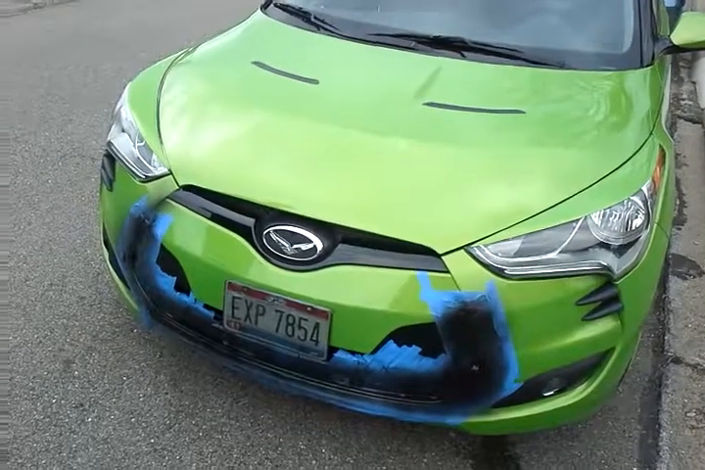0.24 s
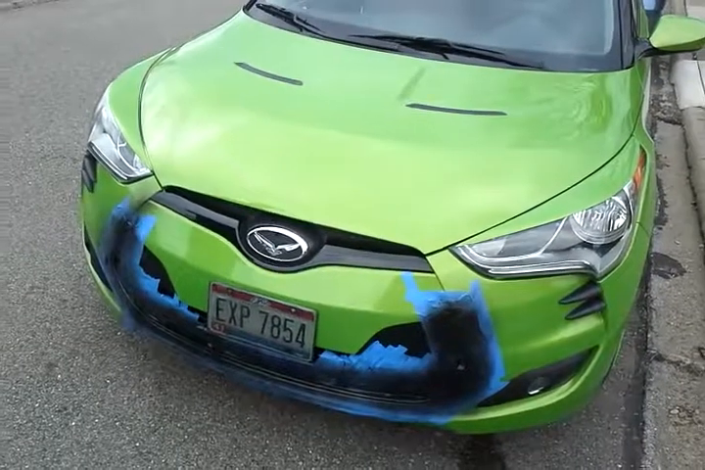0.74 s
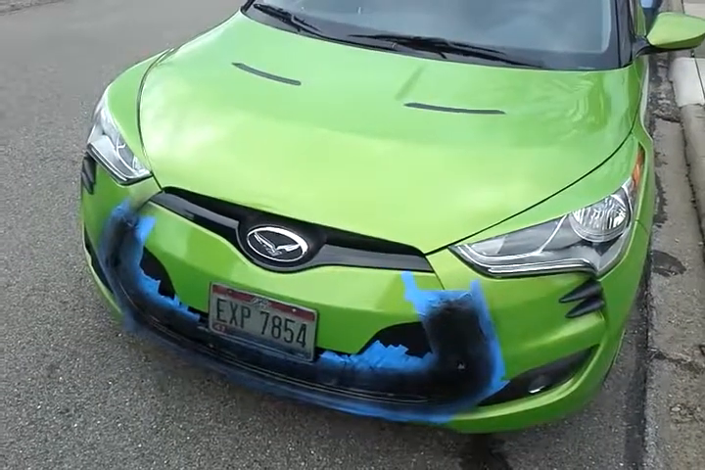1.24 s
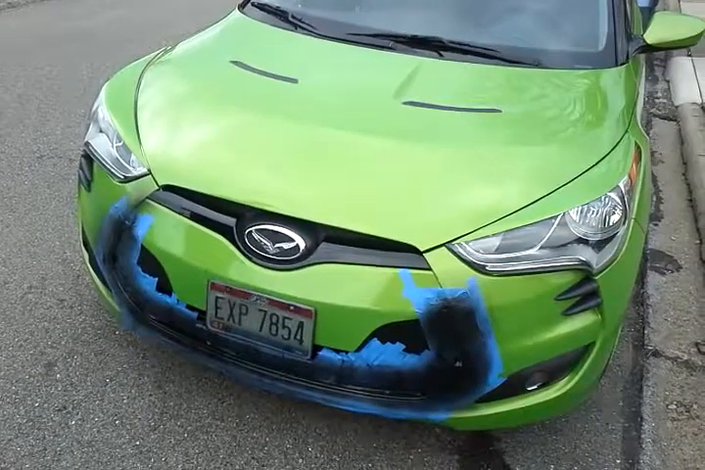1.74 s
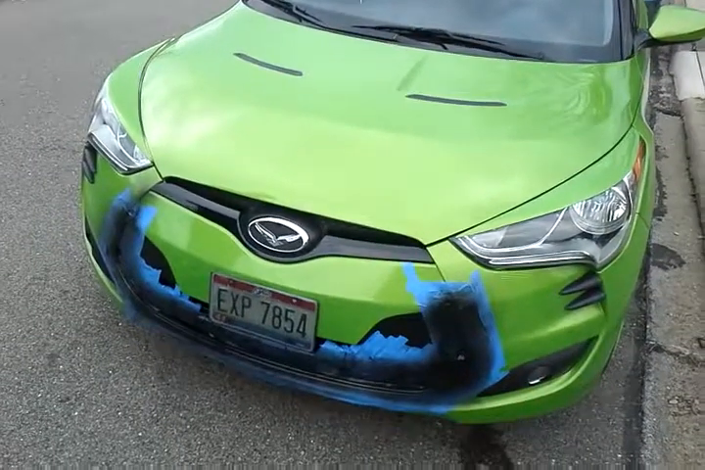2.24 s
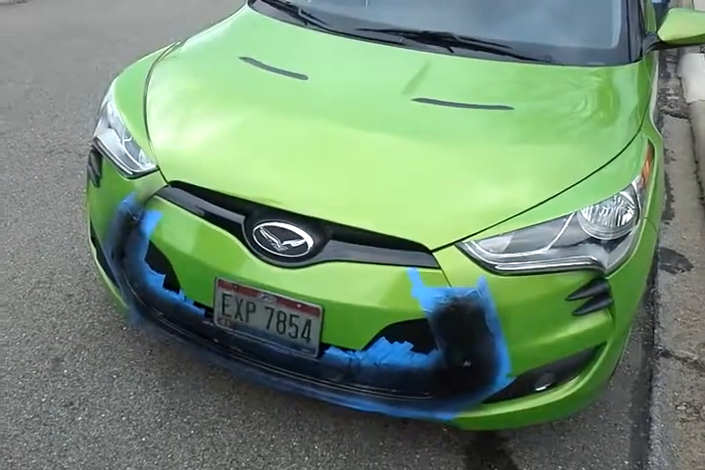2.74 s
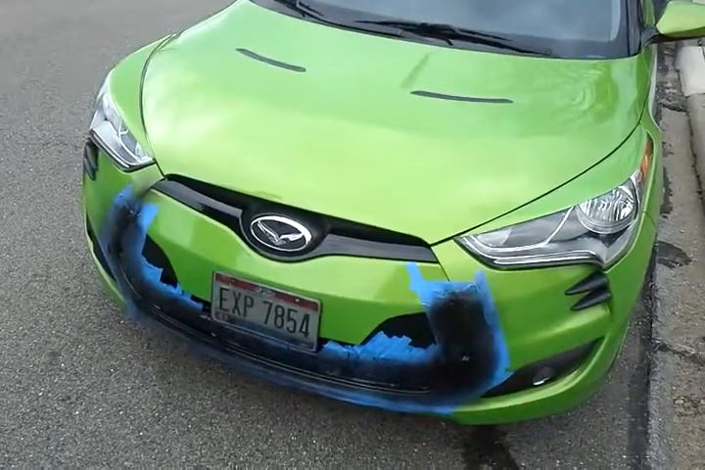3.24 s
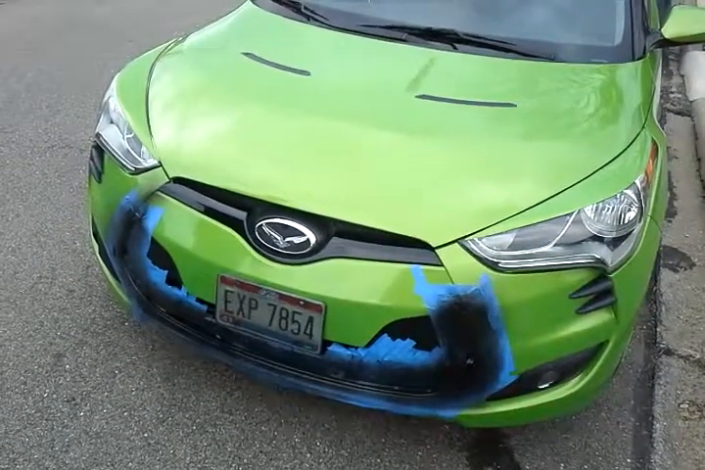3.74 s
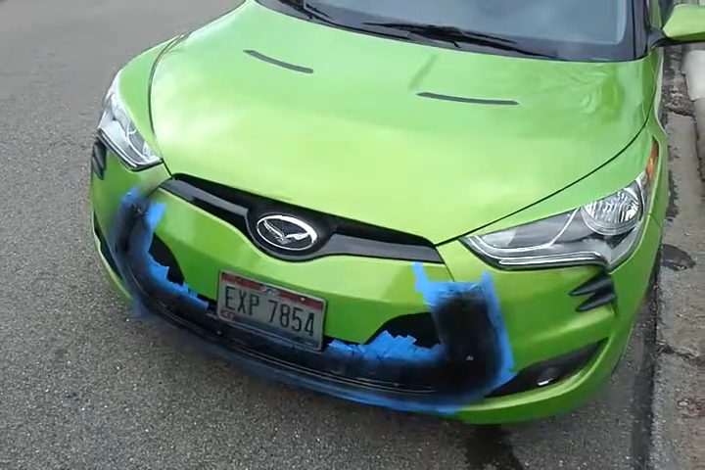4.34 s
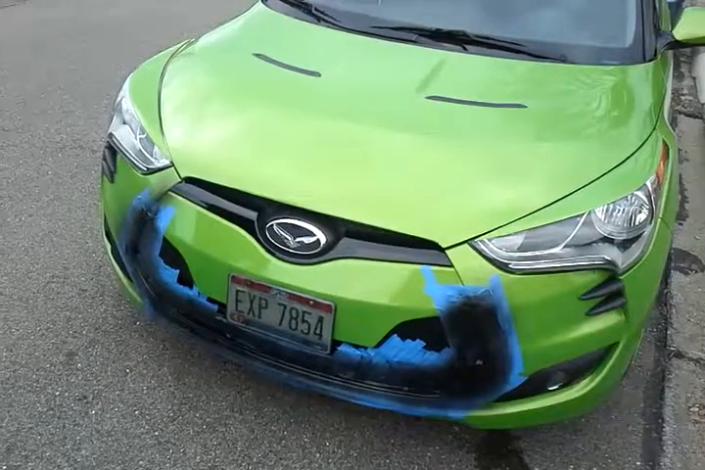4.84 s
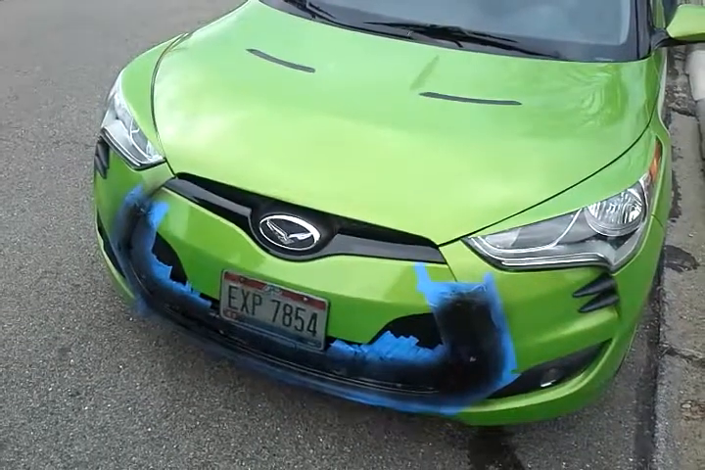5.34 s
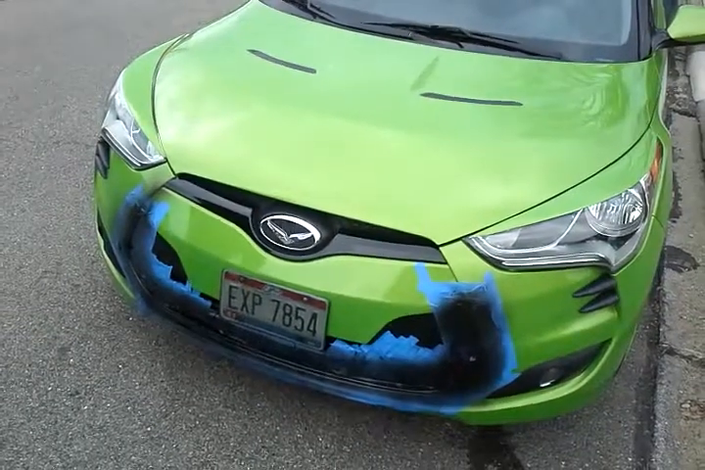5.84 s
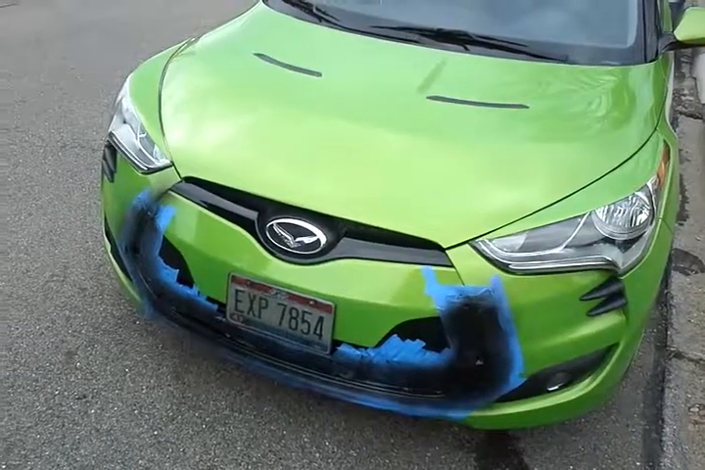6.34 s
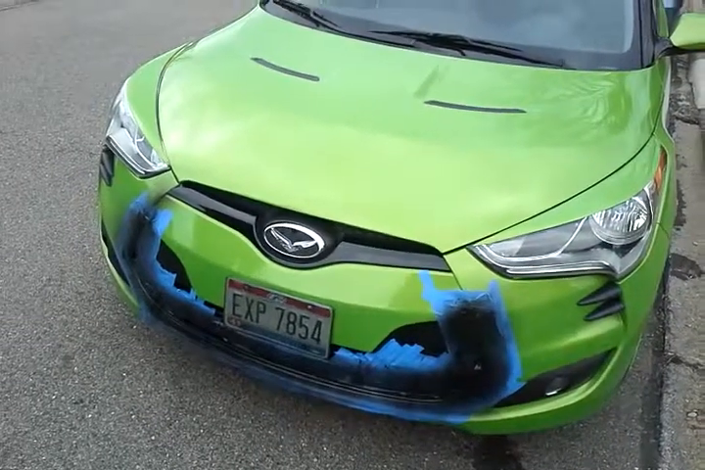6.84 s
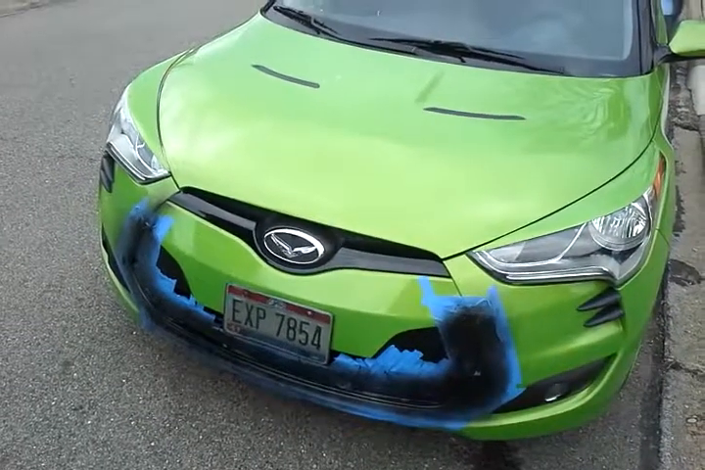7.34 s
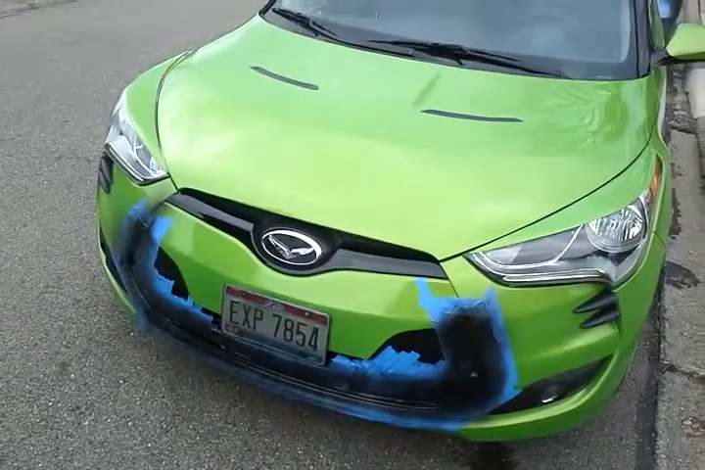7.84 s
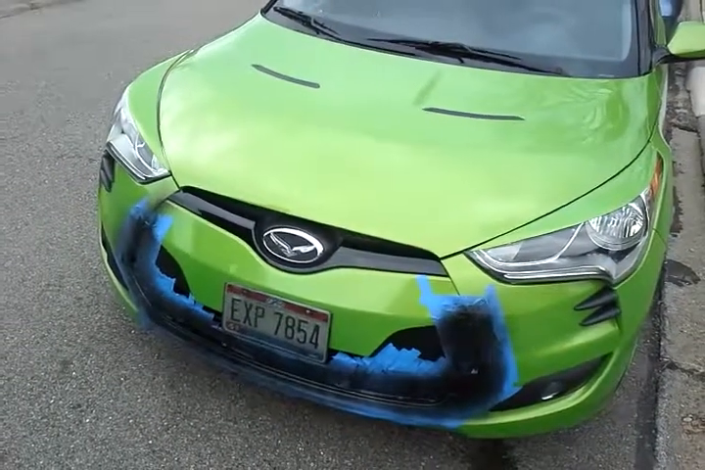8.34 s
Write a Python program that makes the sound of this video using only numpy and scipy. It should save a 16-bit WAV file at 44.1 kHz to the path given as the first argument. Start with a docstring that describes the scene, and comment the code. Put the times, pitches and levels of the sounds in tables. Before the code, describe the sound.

Outdoors, wind puffs and bird whistles and a fast trill over faint traffic, then a spray can is shaken, its ball clacking loudly.

```python
"""Gusts puff into two microphone ports while far traffic hums, and birds whistle, trill and chirp as gliding sines.
Then a spray can is handled with three faint ticks and shaken beside the street: its mixing ball clacks on damped
tin, ringing crowds of decaying modes, and rolling and splashing ring the same tin with dense ticks. Each clack
returns from the asphalt a few ms later and scatters nearby and along the street. The loudest clacks overload the
recorder. Gusts are band-passed random knocks; traffic is noise in third-octave bands."""
import sys
import numpy as np
from scipy import signal
from scipy.io import wavfile

SR = 44100
rng = np.random.default_rng(int(sys.argv[2]) if len(sys.argv) > 2 else 0)


def waveform_to_disk(signal):
    """Save audio, clipped to [-1, 1], as 16-bit WAV at the path in sys.argv[1]."""
    frames = np.transpose(np.atleast_2d(signal))
    scaled = np.clip(frames, -1, 1) * 32767
    samples = np.round(scaled).astype(np.int16)
    wavfile.write(sys.argv[1], SR, samples)


N = 378819

# Gusts on the ports: start_s, length_s, level_db (low part, stronger port), left_minus_right_db
GUSTS = [(0, .041, -31, 10), (0.052, 0.18, -29.5, 14), (0.228, .28, -28.5, 22), (0.244, 0.039, -31.5, -18),
         (0.296, 0.11, -38, -2), (.456, 0.047, -31, -31), (0.48, 0.075, -24, 22), (.519, 0.05, -28.5, 10),
         (0.57, .108, -42.5, 14), (0.799, 0.041, -40.5, 10), (0.893, 0.082, -37.5, -17),
         (2.394, 0.064, -44, 7), (2.493, .114, -51, -3), (3.55, 0.082, -46, 22), (3.673, 0.039, -30.5, 24),
         (3.722, 0.14, -42, 27), (3.781, 0.066, -36, -32), (3.902, 0.14, -40.5, 21), (4.2, 0.13, -43, -17),
         (4.47, .087, -41, 1), (5.238, .056, -39, 18), (5.329, 0.075, -31, 28), (5.377, 0.11, -23.5, 32),
         (5.926, 0.075, -39, -2), (7.434, 0.064, -43, -15)]

# Spectrum of far traffic and air: frequency_hz, relative_level_db (per Hz)
STREET_SPECTRUM = [(24, -42), (40, -10), (76, -2.5), (219, -1.5), (281, -6.5), (416, -0.5), (588, -9.5),
                   (830, 3.5), (1430, -10.5), (2520, -11.5), (2780, -16), (3220, -16), (5970, -28.5),
                   (8020, -20.5), (14500, -27.5)]
# Likeness of the street sound at the two ports: frequency_hz, correlation (-1 to 1)
STREET_LIKENESS = [(60, 0.31), (180, 0.78), (550, 0.83), (1650, -0.2), (4970, -0.000023), (15000, -0.081)]
STREET_DB = -47.5   # rms

# Long whistles of the near bird: start_s, length_s, pitch_hz (at the start), level_db
LONG_NOTES = [(0.024, 0.15, 3427, -35), (0.413, 0.225, 3383, -34.5)]
# Overtones of the long whistles: multiple, level_db (against the fundamental)
OVERTONES = [(3, -32)]
RISE_S, RISE_DB = .03, -22       # swell at the start: duration, starting level
SAG_HZ, SAG_DB = -14.5, -8       # change of pitch and level by the end
FALTER_AT, FALTER_WIDTH, FALTER_DB = 0.66, .1, -13   # one dip: two shares of the length, depth
TRAIL_S, TRAIL_DB, TRAIL_END_DB = 0.29, -19, -37.5   # faint lingering: end after the note, first and last level

# One trill note: time_s (from its reference instant), pitch_hz, relative_level_db
TRILL_NOTE = [(-.012, 3450, -36), (-.008, 3700, -16), (-.001, 4200, -9.5), (0, 4850, -22),
              (.003, 3190, -2.5), (.008, 2950, -12.5), (.016, 2830, -23), (.02, 2730, -25)]
TRILL_COUNT, TRILL_START_S = 14, .9383
TRILL_GAP_S, TRILL_SLOWS_S = .0305, .00037   # first gap, widening per gap
TRILL_DB, TRILL_SWELL_DB, TRILL_ENDS_DB = -36, .15, -3   # base, rise per note, first and last note softer

# Hooked calls of a farther bird: top_s, level_db
HOOKS = [(1.714, -51), (1.875, -56), (5.845, -41.5), (5.999, -49), (6.245, -38.5), (8.054, -51)]
# Shape of the hooked call: time_s (from its top), pitch_hz, relative_level_db
HOOK = [(-.055, 2700, -14), (-.025, 3230, -3), (0, 3360, 0), (.014, 2500, -7), (.09, 2280, -12)]
# Other far chirps: start_s, length_s, first_hz, last_hz, arch_hz, level_db
GLIDES = [(0, 0.077, 7170, 6930, 2, -55), (.008, 0.014, 5000, 4400, -100, -43),
          (0.321, 0.053, 3220, 3110, 2, -52), (0.349, 0.1, 7180, 6880, 50, -49.5),
          (0.393, .02, 5350, 4410, -250, -44), (0.483, 0.083, 2630, 2600, 218, -58),
          (0.562, .04, 2340, 2180, 100, -56), (0.614, 0.08, 2490, 2420, 222, -51),
          (0.719, 0.012, 6000, 9260, 0, -38), (0.733, 0.015, 4960, 4550, 0, -44),
          (.87, 0.073, 2190, 2117, 91, -45.5), (1.13, .04, 2300, 2300, 72, -58),
          (1.282, 0.064, 3000, 3000, 385, -44.5), (2.05, 0.084, 2285, 2420, -2, -60),
          (2.197, 0.31, 2490, 2320, -56, -58.5), (2.275, .28, 2870, 2610, 43.5, -61.5),
          (2.2, 0.16, 7350, 6900, 348, -61), (2.448, 0.12, 6730, 6800, 600, -62),
          (2.57, 0.064, 1740, 1970, 3, -50), (2.67, 0.026, 4000, 5600, 0, -54),
          (2.694, .11, 2830, 3070, 1280, -51.5), (2.746, 0.17, 6940, 7130, 150, -65.5),
          (3.047, 0.19, 7000, 6950, 898, -62), (3.393, 0.19, 6700, 7060, 0, -63),
          (3.497, .09, 2890, 3130, 98, -58.5), (3.642, 0.071, 2900, 3170, 78, -57.5),
          (6.167, 0.028, 4360, 4150, 0, -47), (7.012, .04, 3050, 3080, 60, -50),
          (7.09, .03, 2600, 2720, 0, -44)]
# Level contour of a chirp at its start, each quarter and end: relative_level_db
GLIDE_DB = [-5, -0.5, 1.5, -2.5, -9.5]
NEAR_BIRD_PAN_DB, FAR_BIRD_PAN_DB, BIRD_LAG_S = -7.5, -4, 0.000309   # left minus right; left port late
NEAR_BIRD_ECHO, FAR_BIRD_ECHO = (0.53, -2.5), (.3, -7)   # t60_s, level_db
FAR_FLUTTER_DB = 3.0   # standard deviation

# Blows of the ball in the can, preceded by three faint ticks as the can is handled:
# time_s, strength_db, high_ring_db (added to the modes above 6 kHz)
CLACKS = [(3.188, -49, -12), (3.397, -45, -6), (3.432, -47, -9), (3.8225, -25, 1.5), (3.8942, -36, -5),
          (3.9074, -32.5, 5.5), (3.93, -34, 6), (3.9792, -33.5, -6.5), (4.0868, -18, -12), (4.107, -27, 1),
          (4.1186, -32, 1), (4.215, -35.5, -17), (4.3232, -23, -1.5), (4.35, -29, 0), (4.3737, -26.5, -2.5),
          (4.4704, -34, -3), (4.4868, -34, -1), (4.52, -32, -4), (4.5372, -11.5, -6), (4.618, -34, 3.5),
          (4.639, -33.5, 1.5), (4.6629, -37.5, -2), (4.725, -20, -1.5), (4.746, -33.5, 2), (4.7717, -37, 4),
          (4.8092, -12, -4), (4.8619, -39.5, -9), (4.9982, -23.5, 2.5), (5.0469, -33.5, 2),
          (5.095, -12, -6), (5.1112, -30, 3), (5.1676, -46, 4), (5.2693, -13.5, -1.5), (5.3161, -31.5, 2),
          (5.3397, -37, 6), (5.3794, -10, -6), (5.404, -28, 1.5), (5.4532, -30.5, 2), (5.5341, -12, 4),
          (5.5934, -22.5, 3), (5.6386, -9.5, -9), (5.677, -39.5, 9), (5.7214, -43, 4), (5.7525, -39, -4),
          (5.7975, -13, -2.5), (5.8493, -23.5, -2.5), (5.882, -15.5, -6), (5.8931, -19.5, -2.5),
          (5.9375, -23.5, -29), (6.0086, -23.5, -4), (6.0431, -16, -1.5), (6.0847, -24, 3),
          (6.1287, -21, -6), (6.1372, -12, -7), (6.208, -36, 5), (6.263, -9, 0.5), (6.3183, -25, 3.5),
          (6.3438, -25, 0.5), (6.3922, -14, -0.5), (6.4217, -26, 1.5), (6.4368, -28, 0), (6.4467, -31, 0),
          (6.5056, -7, -2.5), (6.5651, -24, 1.5), (6.596, -34, 5), (6.6252, -12, -7.5),
          (6.6422, -25.5, -0.5), (6.7111, -30.5, 5), (6.727, -11.5, -7.5), (6.8494, -10.5, -6),
          (6.8757, -38, -1), (6.9223, -38.5, -5), (6.9695, -10, -1.5), (7.0167, -36, -14),
          (7.044, -28.5, 5), (7.0728, -8, -7), (7.1278, -36, 5), (7.196, -11.5, -0.5), (7.2604, -23.5, 3.5),
          (7.3046, -9.5, -2.5), (7.3816, -41, -2), (7.437, -12.5, -7.5), (7.4753, -34.5, 5.5),
          (7.52, -24.5, 1), (7.5256, -13.5, -7.5), (7.5917, -22.5, -1.5), (7.6148, -27, -7.5),
          (7.633, -9.5, -6.5), (7.6758, -36, -10), (7.7018, -28, 3.5), (7.7493, -11, -13),
          (7.7691, -24, -5), (7.79, -36, -6), (7.815, -36, -2), (7.8653, -10.5, -3), (7.8993, -31, -15),
          (7.95, -35, 1), (7.9606, -17, -8), (7.969, -22.5, -10), (8.0418, -25, -1), (8.0859, -11.5, -8.5),
          (8.123, -33, -1), (8.15, -36, 1), (8.192, -24, -7), (8.2002, -14, -5.5), (8.264, -29, 4),
          (8.287, -41, -12), (8.3071, -10.5, -5), (8.4052, -32, 5.5), (8.4298, -15.5, -5.5),
          (8.444, -25.5, 0), (8.4623, -30, 0), (8.4736, -33, -17), (8.5456, -12.5, -8.5)]
# Tin held in the hand and damped by paint, each row a crowd of close modes: pitch_hz, level_db, t60_s
TIN = [(374, -25.5, 0.055), (508, -26.5, 0.023), (860, -22, 0.014), (1172, -8.5, 0.016),
       (1541, -9.5, 0.028), (2000, -2, 0.0082), (2452, -7, 0.015), (2790, -9.5, 0.0076), (3210, -15, 0.033),
       (3877, -6.5, 0.0043), (4610, -7.5, 0.0049), (5293, -8.5, 0.0046), (6360, -16, 0.0072),
       (6850, -8, 0.0038), (7830, -6, 0.0064), (8330, -5, 0.0066), (9145, -0.5, 0.0045), (9890, -4, 0.0067),
       (10910, -7, 0.0042), (11580, -3, 0.0021), (13380, -9, 0.0038), (15460, -21, 0.004)]
# Balance of the tin between the ports: frequency_hz, left_minus_right_db
TIN_BALANCE = [(700, -3.5), (1300, -0.5), (2400, -3.5), (4400, 3), (8000, -1), (14000, 9.5)]
CROWD, TIN_DB, SWELL_S = 4, 3.5, 0.00062   # modes per crowd, overall gain, onset time
# Low ring of a blow, relatively stronger for light blows: offset, db per dB of strength, standard deviation
LOW_RING_DB, LOW_RING_PER_DB, LOW_RING_SPREAD_DB = -11, -0.47, 3.0
STRONG_DB = -16   # blows above this bounce
BOUNCE_S, BOUNCE_SPREAD_S, BOUNCE_LEVEL_DB, BOUNCE_CHANCE_DB = 0.038, 0.0083, -43, 3.0   # means and spreads
GROUND_S, GROUND_DB = .0036, -5   # echo from the asphalt
PORT_LAG_S = .00027   # the can reaches the right port late
NEAR_T60_S, NEAR_DB = 0.021, -2.5   # hand, body and car scatter the clack
FAR_T60_S, FAR_DB = 0.1, -18.5      # then the street

# The ball rolls along the wall and the paint splashes: start_s, length_s, level_db
ROLLS = [(3.88, 0.16, -51), (4.0, .09, -52), (4.1, 0.067, -42.5), (4.18, 0.068, -46.5), (4.37, 0.054, -41),
         (4.45, 0.12, -35.5), (4.86, 0.047, -49.5), (5.16, 0.04, -57), (5.47, 0.043, -44),
         (5.71, 0.058, -45), (5.89, 0.031, -40), (5.97, 0.051, -50), (6.14, 0.031, -36.5),
         (6.19, 0.043, -39), (6.42, 0.084, -44), (7.12, .05, -41), (7.76, 0.078, -47), (7.94, 0.051, -37.5),
         (8.11, .05, -39), (8.2, 0.026, -39), (8.27, 0.049, -37), (8.35, 0.056, -44.5), (8.43, 0.082, -36)]
RATTLE = (3.8, 4.79, -52)   # faint long splash while shaking: start_s, length_s, level_db

CUTOFF_HZ = 15200   # start of the stop band


def from_db(db):
    """Decibels are twenty times the logarithm of an amplitude ratio."""
    return 10 ** (np.asarray(db) / 20)


def rms_one(x):
    """Division by the root mean square gives unit power."""
    return x / np.sqrt(np.mean(x ** 2) + 1e-20)


def at_hz(points, hz):
    """A spectrum is interpolated linearly over logarithmic frequency."""
    points = np.array(points)
    return np.interp(np.log(hz), np.log(points[:, 0]), points[:, 1])


def drift(rate_hz):
    """Noise through two equal real poles wanders slowly; its rms is one."""
    step = 40   # samples between computed values
    pole = np.exp(-2 * np.pi * rate_hz * step / SR)
    noise = rng.standard_normal(N // step + 2002)
    slow = signal.lfilter([1], [1, -2 * pole, pole * pole], noise)[2000:]
    return np.interp(np.arange(N) / step, np.arange(len(slow)), rms_one(slow))


def band(x, low_hz, high_hz):
    """A band-pass filter keeps the energy between two corner frequencies."""
    return signal.sosfilt(signal.butter(2, [low_hz, high_hz], "band", fs=SR, output="sos"), x)


def spans(rows, edge=0.5):
    """Envelopes superpose: one smooth hump per (start_s, length_s, level_db)."""
    out = np.zeros(N)
    for start, length, level_db in rows:
        i, j = max(0, int(start * SR)), min(N, int((start + length) * SR))
        out[i:j] += from_db(level_db) * signal.windows.tukey(j - i, edge)
    return out


def scattered(x, t60, level_db):
    """Diffuse reflection: dense echoes decay exponentially, independently at each port."""
    t = np.arange(int(t60 * SR)) / SR
    decay = from_db(-60 * t / t60)
    noise = rng.standard_normal((2, len(t)))
    echoes = rms_one(noise * decay) / np.sqrt(len(t))
    return from_db(level_db) * signal.fftconvolve(x, echoes, axes=1)[:, :N]


def gusts():
    """Turbulent pressure: eddies knock each port separately as low pulses, brighter when strong."""
    out = np.zeros((2, N))
    for port in range(2):
        knocks = rng.random(N) < 380.0 / SR   # 380 per second on average
        eddies = knocks * rng.standard_normal(N) * from_db(2.0 * drift(16))
        soft = rms_one(band(eddies, 93, 239))
        sharp = rms_one(band(band(eddies, 136, 385), 102, 660))
        sign = 2 * port - 1
        rows = [(start, length, level_db - max(0, pan_db * sign)) for start, length, level_db, pan_db in GUSTS]
        gain = spans(rows)
        out[port] = gain * (soft + 8.3 * gain * sharp)   # the sharp part grows with the square
    return out


def street():
    """Partial coherence: third-octave noise bands share a mid part and oppose a side part at the ports."""
    out, together = 0, drift(1.5)
    edges = 40 * 2 ** np.arange(0, 8.7, 1 / 3)
    white = rng.standard_normal((2, 2, N))
    for k, (low, high) in enumerate(zip(edges, edges[1:])):
        mid, side = band(white[k % 2], low, high)
        hz = np.sqrt(low * high)
        alike = np.clip(at_hz(STREET_LIKENESS, hz), -1, 1)
        flicker_db = .6 * together + .9 * drift(10)
        gain = from_db(at_hz(STREET_SPECTRUM, hz) + flicker_db)
        out = out + gain * (np.sqrt(1 + alike) * mid + np.sqrt(1 - alike) * side * [[1], [-1]])
    return from_db(STREET_DB) * rms_one(out)


def note(out, rows, overtones=()):
    """Phase is the integral of frequency: adds to out a whistle along (time_s, pitch_hz, level_db)."""
    s, hz, level_db = np.transpose(rows)
    i = np.arange(int(s[0] * SR), int(s[-1] * SR))
    phase = 2 * np.pi * np.cumsum(np.interp(i / SR, s, hz)) / SR
    tone = np.sin(phase) + sum(from_db(db) * np.sin(k * phase) for k, db in overtones)
    fade = signal.windows.tukey(len(i), min(1, 0.0051 * SR / len(i)))
    level = from_db(np.interp(i / SR, s, level_db))
    return out + np.bincount(i, np.sqrt(2) * tone * fade * level, N)   # root two makes the level rms


def long_note(start, length, hz, level_db):
    """Amplitude and frequency contour: a swell, a sag with one falter, a faint trail."""
    share = np.array([RISE_S / length, FALTER_AT - FALTER_WIDTH, FALTER_AT, FALTER_AT + FALTER_WIDTH, 1])
    falter_db = FALTER_DB * (share == FALTER_AT)
    body = np.transpose([length * share, SAG_HZ * share, SAG_DB * share + falter_db])
    trail = [(length + 0.0054, SAG_HZ, TRAIL_DB), (length + TRAIL_S, SAG_HZ, TRAIL_END_DB)]
    return np.vstack([(0, 0, RISE_DB), body, trail]) + [start, hz, level_db]


def glide(start, length, first_hz, last_hz, arch_hz, level_db):
    """Frequency modulation: a straight slide in pitch carries a half-sine arch."""
    u = np.linspace(0, 1, 17)
    pitch = first_hz + (last_hz - first_hz) * u + arch_hz * np.sin(np.pi * u)
    shape_db = np.interp(u, np.linspace(0, 1, len(GLIDE_DB)), GLIDE_DB)
    return np.transpose([start + length * u, pitch, level_db + shape_db])


def ports(x, pan_db, lag_s):
    """Direction gives a level difference between the ports, and a lead of the right one."""
    late = np.interp(np.arange(N) - lag_s * SR, np.arange(N), x)
    return np.array([late, x]) * from_db([[pan_db / 2], [-pan_db / 2]])


def birds():
    """Propagation: near whistles and trill echo among houses; far calls also flutter in turbulent air."""
    near, far = np.zeros((2, N))
    for row in LONG_NOTES:
        near = note(near, long_note(*row), OVERTONES)
    for row in GLIDES:
        far = note(far, glide(*row))
    for k in range(TRILL_COUNT):
        s = TRILL_START_S + TRILL_GAP_S * k + TRILL_SLOWS_S * k * (k - 1) / 2
        level_db = TRILL_DB + TRILL_SWELL_DB * k + TRILL_ENDS_DB * (k in (0, TRILL_COUNT - 1))
        near = note(near, np.array(TRILL_NOTE) + [s, 0, level_db])
    for s, level_db in HOOKS:
        far = note(far, np.array(HOOK) + [s, 0, level_db])
    near = ports(near, NEAR_BIRD_PAN_DB, BIRD_LAG_S)
    far = ports(far * from_db(FAR_FLUTTER_DB * drift(40)), FAR_BIRD_PAN_DB, BIRD_LAG_S)
    return near + scattered(near, *NEAR_BIRD_ECHO) + far + scattered(far, *FAR_BIRD_ECHO)


def blows():
    """Impact and rebound: strong clacks bounce faintly, and light blows have relatively more low ring."""
    s, body_db, high_db = np.transpose(CLACKS)
    luck = rng.standard_normal((len(s), 4))
    strong = body_db > STRONG_DB
    low_db = LOW_RING_DB + LOW_RING_PER_DB * body_db + LOW_RING_SPREAD_DB * luck[:, 0]
    bounce_db = BOUNCE_LEVEL_DB + BOUNCE_CHANCE_DB * luck[:, 1]
    bounce_low_db = LOW_RING_DB + LOW_RING_PER_DB * bounce_db + LOW_RING_SPREAD_DB * luck[:, 2]
    bounce_s = s + BOUNCE_S + BOUNCE_SPREAD_S * luck[:, 3]
    bounces = np.array([bounce_s, bounce_db, bounce_low_db, high_db])
    return np.hstack([[s, body_db, low_db, high_db], bounces[:, strong]])


def tin():
    """Modal synthesis: each blow rings crowds of modes, shifted by moving paint, with new scatter each time."""
    s, body_db, low_db, high_db = blows()
    hz, mode_db, t60 = np.repeat(np.transpose(TIN), CROWD, axis=1)
    low, high = hz < 1700, hz > 6000
    luck = rng.standard_normal((len(s), 8, len(hz)))
    scatter = rng.standard_normal((len(s), 2, 2000))
    near_t = np.arange(2000) / SR
    near = from_db(-60 * near_t / NEAR_T60_S) * (1 - np.exp(-(near_t / .005) ** 2))
    near = from_db(NEAR_DB) * near / np.linalg.norm(near)
    t, out = np.arange(1000)[:, None] / SR, np.zeros((2, N + 4000))
    fade = from_db(-60 * t / t60) * (1 - np.exp(-(t / SWELL_S) ** 2))
    fade = fade * (.3 + np.exp(-(t / .0017) ** 2))   # a first burst until the paint closes over the spot
    for k in range(len(s)):
        pitch, phase = hz * (1 + .06 * luck[k, 0]), 9 * luck[k, 1]
        colour_db = TIN_DB + body_db[k] + mode_db + low * low_db[k] + high * high_db[k]
        for port in range(2):
            port_phase = phase + 0.69 * luck[k, 6 + port]   # ports see other sides of the shell
            modes = fade * np.sin(2 * np.pi * pitch * t + port_phase)
            side_db = colour_db + at_hz(TIN_BALANCE, hz) * (.5 - port)
            direct = modes @ from_db(side_db + 2 * luck[k, 2 + port])
            ground = modes @ from_db(side_db + GROUND_DB + 2 * luck[k, 4 + port])
            nearby = signal.fftconvolve(direct, near * scatter[k, port])
            at = round((s[k] + port * PORT_LAG_S) * SR)
            for delay, sound in [(0, direct), (GROUND_S, ground), (0, nearby)]:
                i = at + round(delay * SR)
                out[port, i:i + len(sound)] += sound
    return out[:, :N]


def ring(clicks, hz, t60):
    """Impulse response of a resonator: a unit click sets a decaying sine of initial height 1 ringing."""
    r, w = from_db(-60 / (t60 * SR)), 2 * np.pi * hz / SR
    return signal.lfilter([0, np.sin(w)], [1, -2 * r * np.cos(w), r * r], clicks + 1e-18)


def rolls():
    """Random excitation: dense uneven ticks drive the tin modes, which the wet contact damps further."""
    born = rng.random((2, N)) < 1500 * from_db(3.5 * drift(40)) / SR
    ticks = born * rng.laplace(size=(2, N)) * from_db(2 * drift(60))
    ticks[1] = np.roll(ticks[0], round(PORT_LAG_S * SR)) + 0.85 * ticks[1]
    ticks = ticks + from_db(GROUND_DB) * np.roll(ticks, round(GROUND_S * SR), axis=1)
    rings = 0
    for k, (hz, mode_db, t60) in enumerate(TIN):
        gain = from_db(mode_db - 3.0 * (hz > 6000)) * (-1) ** k   # neighbouring modes alternate in sign
        rings = rings + gain * ring(ticks, hz, 0.45 * t60)
    level = spans(ROLLS) + spans([RATTLE], edge=.05) * from_db(4 * drift(12))
    return level * rms_one(band(rings, 490, 14300)) * from_db([[-1.2], [1.2]])


def can():
    """Radiation efficiency: the small can radiates no bass; the street scatters its clacks and rolls."""
    dry = signal.sosfilt(signal.butter(2, 250, "high", fs=SR, output="sos"), tin() + rolls())
    return dry + scattered(dry, FAR_T60_S, FAR_DB)


def scene():
    """Superposition: the pressures of all sources add at the two ports."""
    return gusts() + street() + birds() + can()


def record(dry):
    """Overload: peaks clip at full scale, between two low-pass filters that cut the top."""
    cut = signal.sosfilt(signal.cheby2(12, 45, CUTOFF_HZ, fs=SR, output="sos"), dry)
    full = np.clip(cut, -1, 1)
    return signal.sosfilt(signal.cheby2(10, 60, CUTOFF_HZ + 1500, fs=SR, output="sos"), full)


dry = scene()
out = record(dry)
waveform_to_disk(out)
```